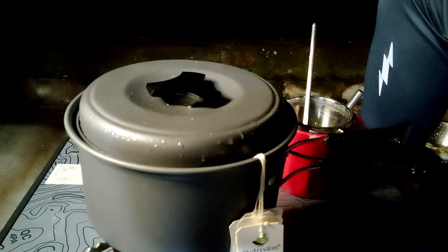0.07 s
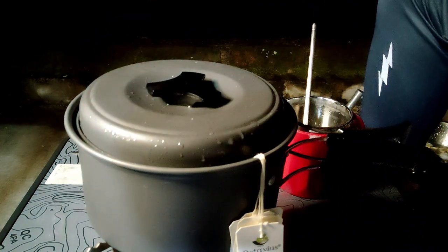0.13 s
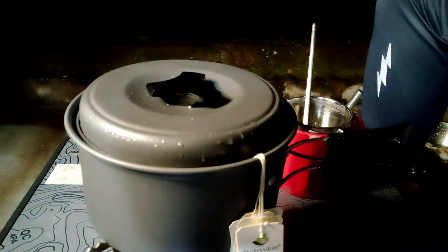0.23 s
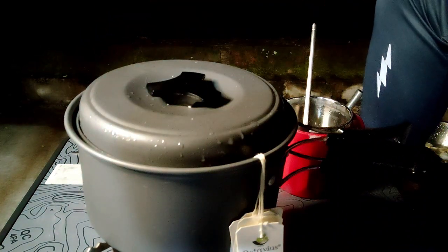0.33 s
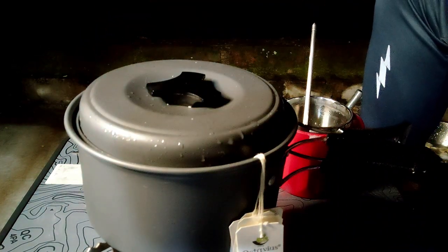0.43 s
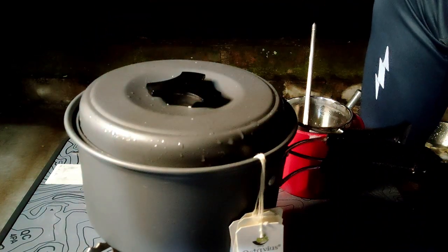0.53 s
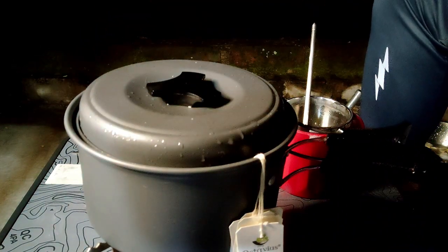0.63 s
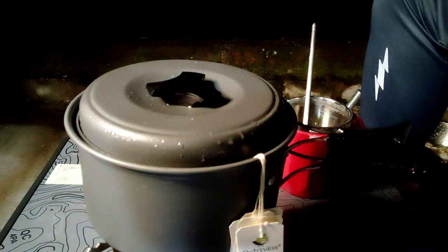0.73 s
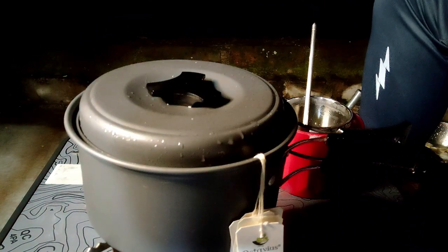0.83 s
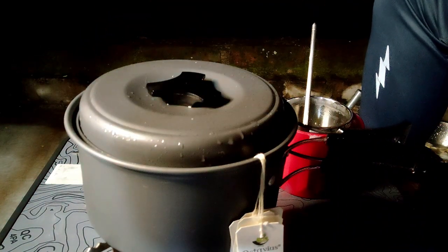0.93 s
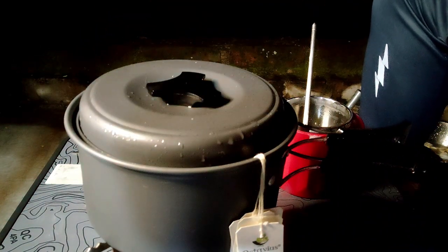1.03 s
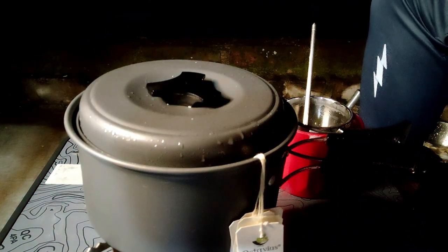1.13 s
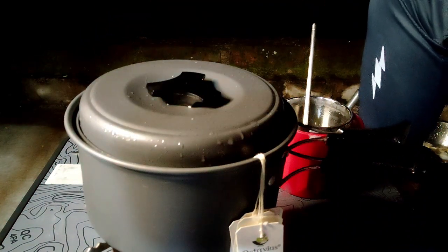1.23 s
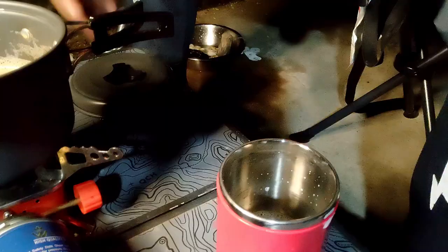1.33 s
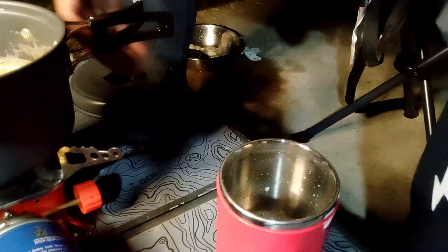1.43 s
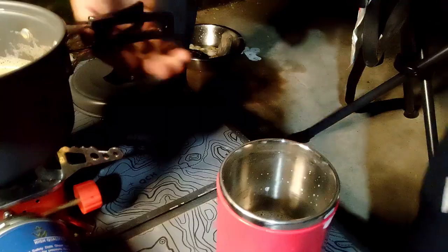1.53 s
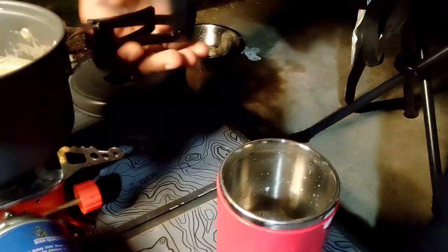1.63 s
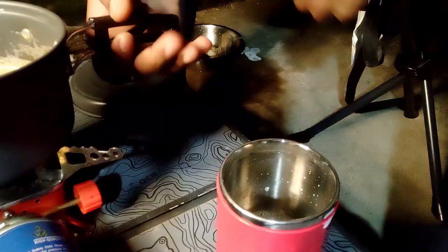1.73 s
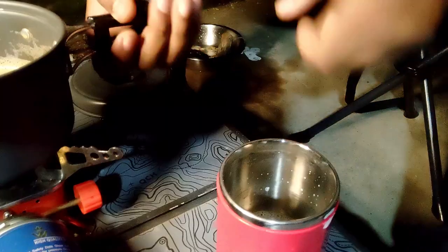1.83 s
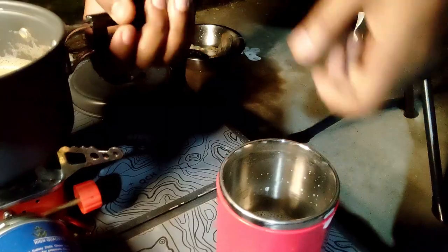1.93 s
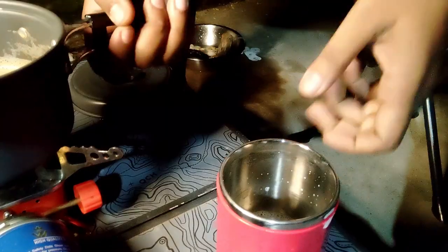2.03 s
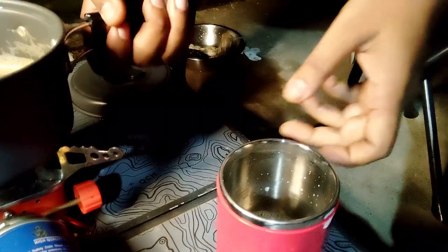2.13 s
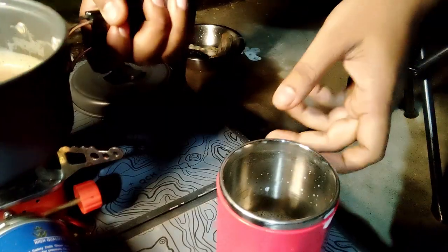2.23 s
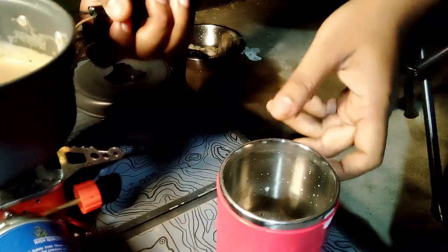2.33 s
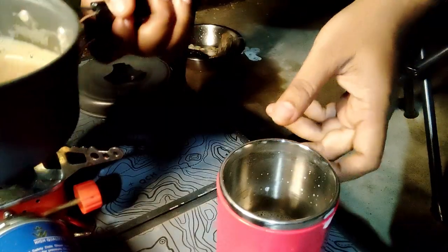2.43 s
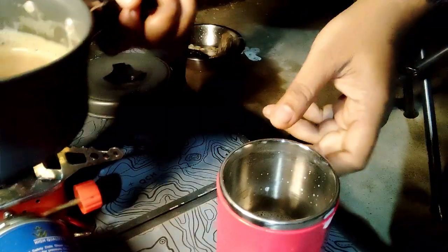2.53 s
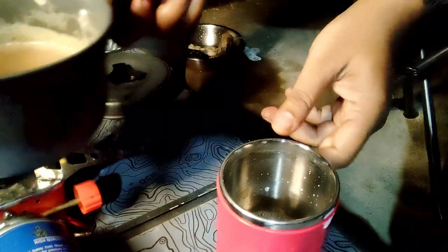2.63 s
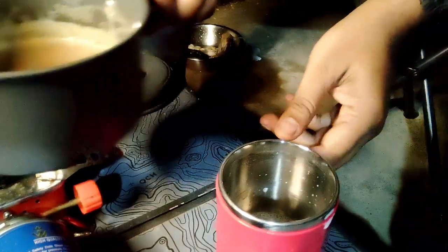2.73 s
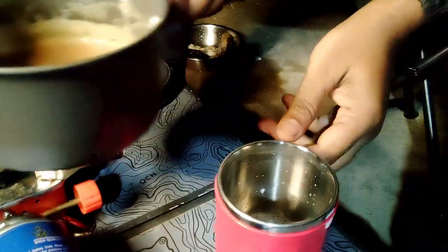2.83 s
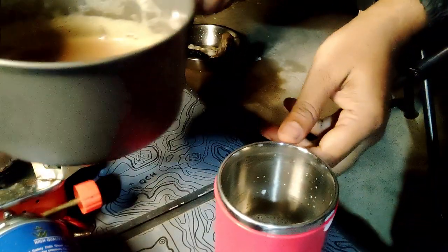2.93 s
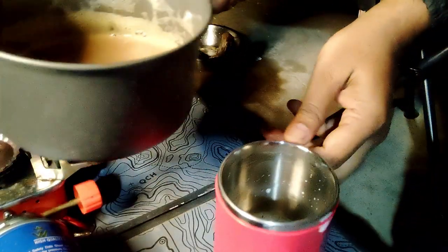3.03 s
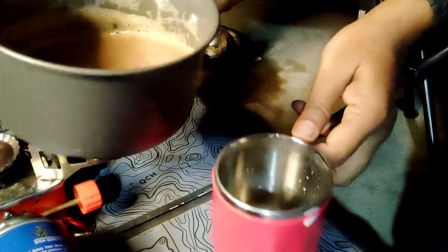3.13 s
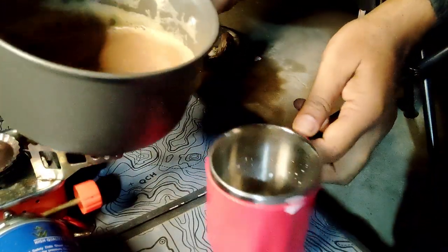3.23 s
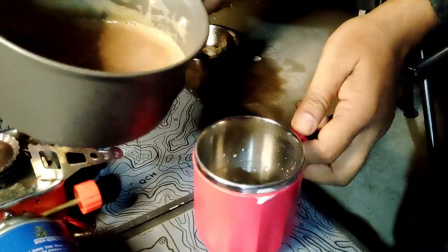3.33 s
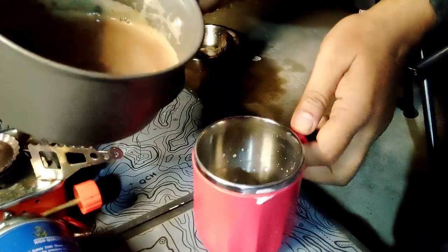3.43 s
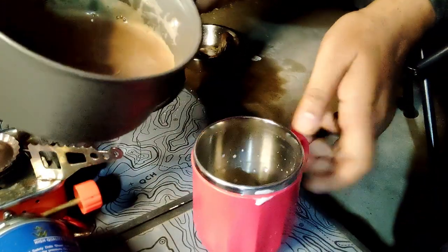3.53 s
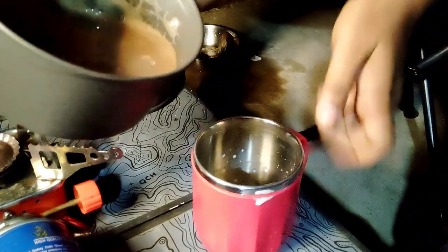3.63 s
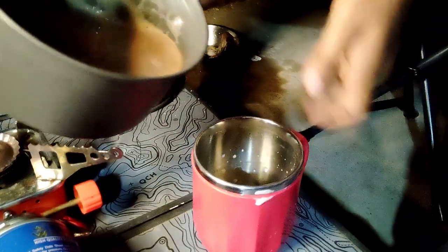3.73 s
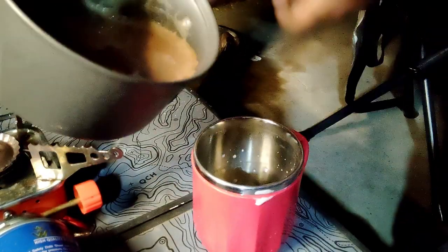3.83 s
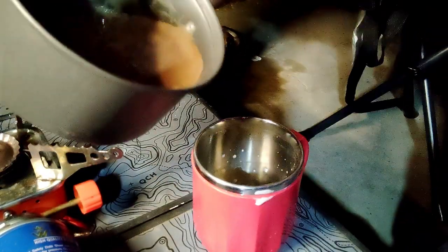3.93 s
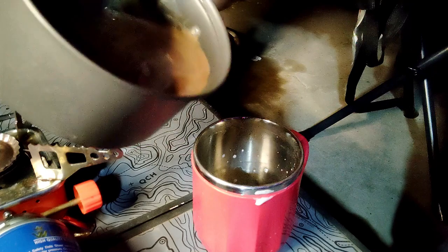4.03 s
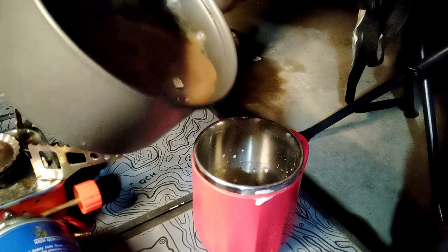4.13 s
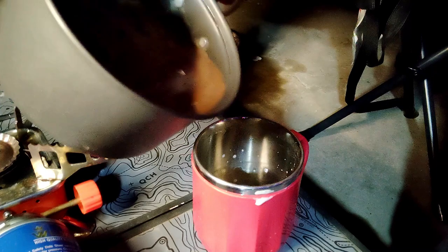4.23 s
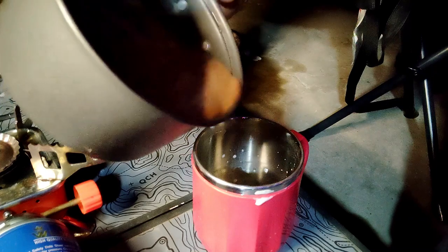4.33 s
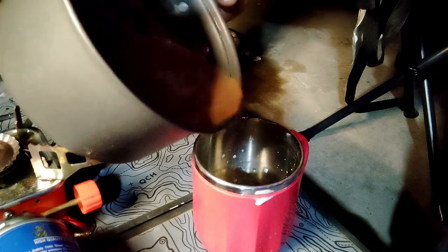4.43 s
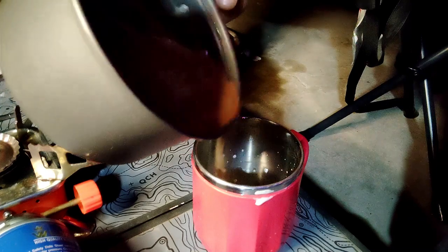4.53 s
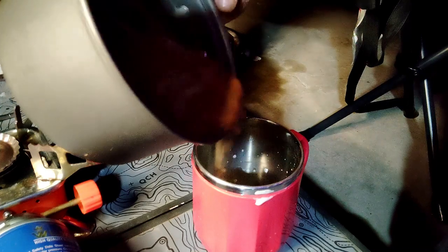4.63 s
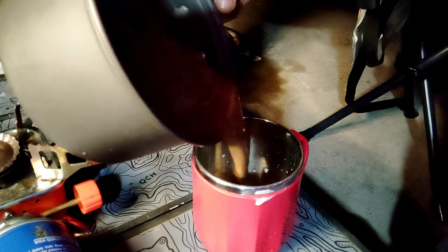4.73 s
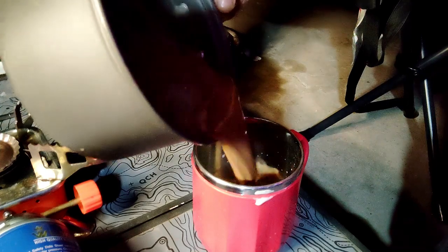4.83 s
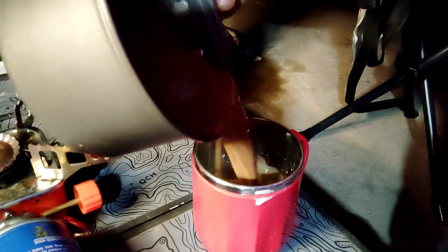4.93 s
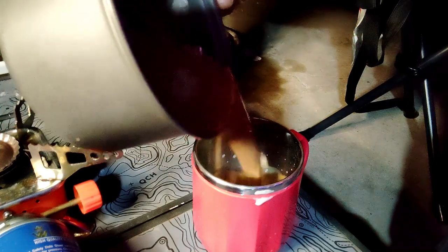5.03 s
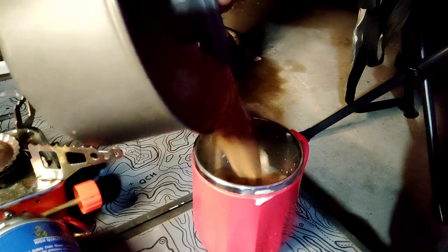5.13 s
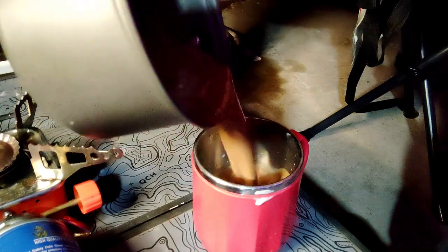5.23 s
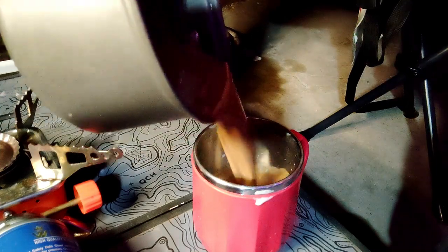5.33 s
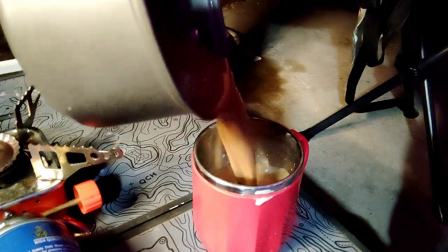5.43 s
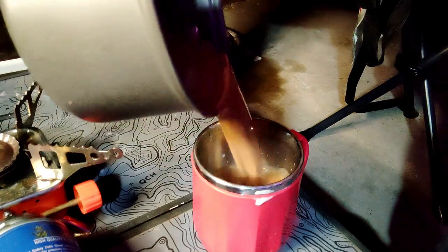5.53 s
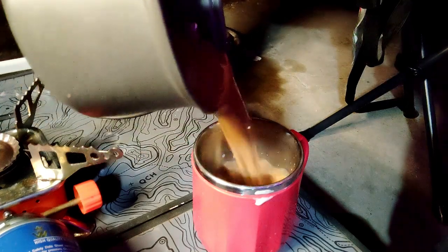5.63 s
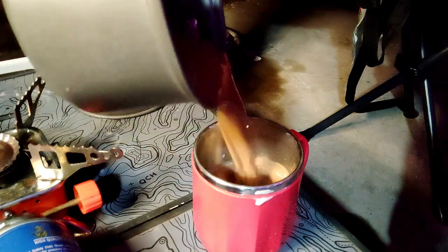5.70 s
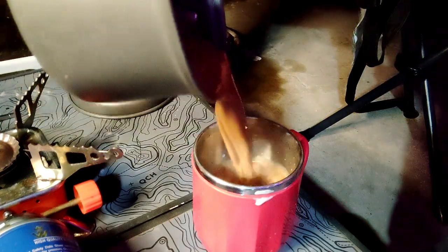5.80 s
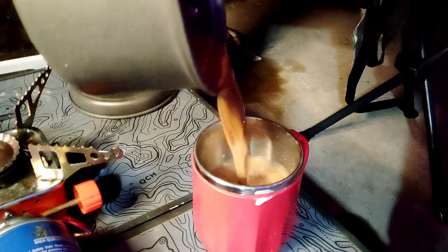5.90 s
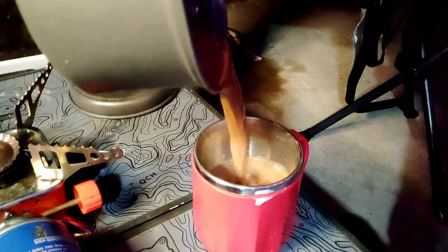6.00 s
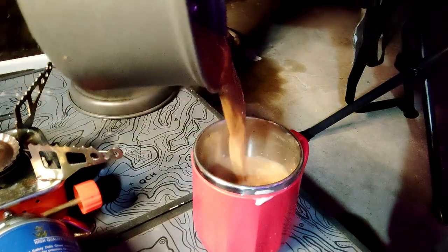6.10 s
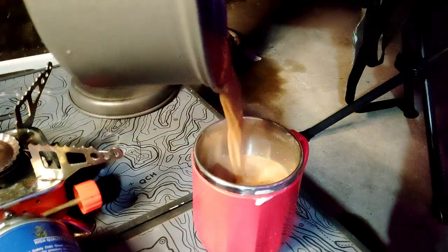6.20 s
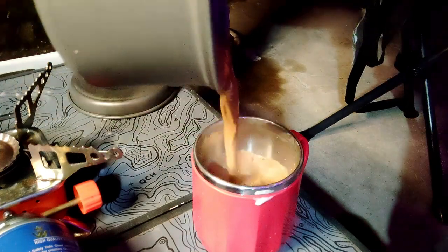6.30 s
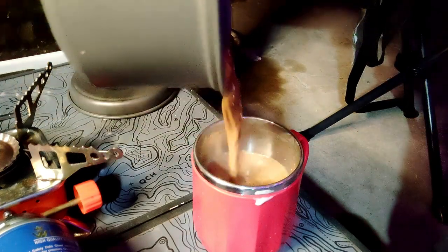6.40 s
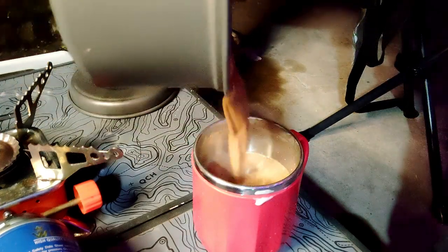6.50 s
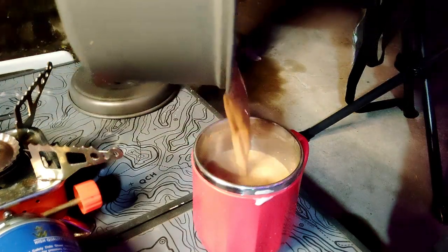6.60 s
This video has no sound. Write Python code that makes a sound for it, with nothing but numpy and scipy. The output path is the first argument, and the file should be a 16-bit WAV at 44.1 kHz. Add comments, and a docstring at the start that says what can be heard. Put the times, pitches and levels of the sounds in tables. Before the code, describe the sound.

Insects drone under a soft hiss at a campsite at night. After a brief drop in all sound, metal cookware clanks close by and a pot judders on a folding table while a cricket chirps. A steel mug is dragged with rattling knocks. Then tea is poured into it, first ticking on bare steel, then drumming, splashing and gurgling as it fills.

```python
"""Insects drone around a campsite at night, under a soft hiss that comes and goes and a few dull bumps.
Cookware clanks on a folding table, a shoved pot judders by stick and slip, and a steel mug is dragged
into place, ringing the table. Then tea is poured from a pot: it drums on the mug's bottom, whose ring
sinks as it is covered, and splashes and gurgles as it traps bubbles of air.
The whole sound dips briefly just before the clanks."""
import sys
import numpy as np
from scipy import signal
from scipy.fft import rfft, irfft, next_fast_len
from scipy.io import wavfile
from scipy.ndimage import uniform_filter1d, map_coordinates

SR = 44100
rng = np.random.default_rng(int(sys.argv[2]) if len(sys.argv) > 2 else 0)


def pcm_store(signal):
    """Save signal as 16-bit PCM."""
    levels = np.round(np.clip(np.atleast_2d(signal), -1, 1) * 32767)
    wavfile.write(sys.argv[1], SR, levels.astype(np.int16).T)


N = 293706

# strength of the pour, a trickle and then the full stream: time_s, level_db
FLOW = [(4.68, -58), (4.798, -46.5), (4.93, -57.5), (5.02, -59), (5.074, -38), (5.302, -38.5),
        (5.312, -36.5), (5.452, -38), (5.504, -43), (5.964, -37.5), (6.038, -42.5), (6.11, -40),
        (6.39, -46.5), (6.66, -43.5)]
POUR_START_S, STREAM_START_S, POUR_END_S = FLOW[0][0], FLOW[3][0], FLOW[-1][0]
# modes of the mug's bottom: ratio_to_lowest, level_db
BOTTOM_MODES = [(1, 7), (1.42, -9)]
BARE_HZ, LOADED_HZ = 790, 287  # its lowest mode, bare and under deep tea
COVERED_S, LOADING_S = 5.12, 0.363  # when tea covers it; time constant of the sinking pitch
# air resonances inside the mug: pitch_hz, width_hz, level_db
CAVITY = [(620, 190, -9), (864, 180, -9), (1340, 140, -3), (1810, 470, -4.5), (2460, 180, -1),
          (3300, 270, 3.5), (4140, 570, -1), (5490, 340, 0)]
# EQ of the fine spray: frequency_hz, gain_db
SPRAY_EQ = [(300, 2.5), (900, -13), (1400, 8), (2500, 0.5), (3400, -3.5), (4800, 4), (6200, -3.5),
            (9500, -19), (12000, -26), (16000, -31)]
# the biggest splashes: start_s, level_db, pitch_hz, tick_relative_db, hollow_relative_db
SPLASHES = [(4.9538, -12.5, 2700, -11, -12), (4.9745, -16.5, 2900, 1, -12), (5.0597, -20.5, 3600, -30, -5),
            (5.0743, -21, 4080, -27, -6), (5.1115, -19, 3600, -13, -8), (5.1235, -19.5, 3500, -5, -9),
            (5.1548, -17, 3500, -20, 1), (5.173, -18, 3880, -30, -11), (5.22, -20, 3630, -25, -21),
            (5.253, -18, 4470, -30, -16), (5.307, -20, 4950, -25, -20), (5.312, -22, 3400, -26, -13),
            (5.323, -16, 3520, -20, -3), (5.3354, -15.5, 4570, -32, -19), (5.355, -15.5, 3340, -22, -10),
            (5.369, -14.5, 3300, -34, -13), (5.383, -26, 3330, -28, -6), (5.4152, -18.5, 3070, -28, -14),
            (5.425, -15.5, 3250, -32, -10), (5.437, -21, 4480, -27, -10), (5.4544, -13, 3300, -22, -10),
            (5.461, -14.5, 3240, -35, -9), (5.509, -20, 1440, -26, 2), (5.546, -29, 2540, -24, -4),
            (5.557, -23, 1850, -19, 8), (5.603, -18, 3150, -15, -3), (5.615, -27.5, 6260, -11, -14),
            (5.651, -26, 3140, -26, -6), (5.679, -19, 3600, -15, -9), (5.715, -21, 4250, -10, -4),
            (5.735, -37, 2700, -24, 3), (5.759, -25, 3450, -4, -12), (5.7838, -19.5, 1310, -23, 0),
            (5.809, -26.5, 2460, -28, -9), (5.837, -26, 3370, -5, -6), (5.863, -17, 4080, -26, -5),
            (5.888, -20, 3900, -32, -11), (5.923, -20.5, 4280, -28, 7), (5.9468, -15.5, 4000, -31, -9),
            (5.961, -20.5, 3290, -26, -12), (6.027, -24, 4200, -32, 2), (6.049, -27, 3250, -30, 0),
            (6.065, -22, 3300, -24, -3), (6.074, -28, 2700, -32, 8), (6.089, -19.5, 3200, -34, 9),
            (6.1023, -14.5, 3380, -40, -2), (6.118, -15.5, 3400, -40, -2), (6.1415, -16, 3550, -35, 4),
            (6.1604, -21, 3500, -38, 1), (6.1675, -15.5, 3630, -32, -3), (6.1763, -22, 3400, -24, -0.5),
            (6.183, -26, 4080, -30, -6), (6.205, -23.5, 3660, -35, -10), (6.241, -17, 3460, -33, -6.5),
            (6.2888, -21.5, 3490, -35, -10), (6.2957, -20, 4160, -32, -13), (6.32, -24, 3350, -7, 9),
            (6.354, -27, 3420, -35, -12), (6.464, -23, 3500, -8, -2), (6.515, -22, 3900, -30, 9),
            (6.558, -27.5, 3640, -28, -12), (6.643, -27, 1600, -26, -1)]
# the mug's hollow answer to a splash: pitch_hz, width_hz, level_db
HOLLOW_MODES = [(1338, 57, 0), (1630, 190, -4.5), (1980, 280, -5), (2510, 170, -2.5)]
# EQ of a drop ticking on steel: frequency_hz, gain_db
TICK_EQ = [(1000, -28), (4500, 7.5), (7500, 4), (9500, -12), (12000, 7), (16000, -8)]
# slugs of tea that trap air: start_s, level_db, pitch_hz
GLUGS = [(5.222, -32, 677), (5.281, -29.5, 830), (5.322, -22.5, 773), (5.334, -27.5, 577),
         (5.456, -27.5, 790), (5.507, -23, 454), (5.732, -20, 219), (5.742, -25, 321), (5.779, -22.5, 336),
         (5.955, -32, 264), (6.162, -31, 328), (6.52, -35.5, 294)]
# first drops on bare steel: start_s, level_db
DRIPS = [(4.716, -22), (4.751, -24), (4.803, -43), (4.838, -37), (4.872, -34), (4.919, -35), (4.958, -37.5),
         (4.992, -39), (5.073, -30), (5.111, -26.5)]
# ring of the empty mug: pitch_hz, level_db, t60_s
EMPTY_MUG_MODES = [(790, 5, 0.079), (886, 0, 0.073), (3084, -13, 0.37), (4130, -9, 0.2), (5370, -15, 0.15)]
# the note the trickle draws from the mug: time_s, pitch_hz, level_db
SINGING = [(4.7, 1300, -60), (4.735, 1350, -48), (4.775, 1358, -41), (4.88, 1332, -52.5), (4.93, 1300, -62),
           (5.1, 1285, -58)]
# stereo tilt of the splashing: frequency_hz, left_over_right_db
MUG_PAN = [(60, 0), (110, 1), (200, -14), (380, 2), (700, 5), (1290, 6), (2380, 8.5), (4400, 12.5),
           (8120, -10), (15000, 8)]

# cookware contacts: start_s, level_db, thud_relative_db, click_relative_db, chatter_s
CLANKS = [(1.679, -17, -7, -10, 0.0063), (1.71, -24, 1, -3, .008), (1.749, -3.5, -10.5, -3.5, .012),
          (1.768, -12.5, -9, -25, .01), (1.815, -6.5, -6.5, -8, .012), (1.838, -15, -3.5, -25, 0.011),
          (2.085, -18.5, 2, -15, .004), (2.106, -13.5, -26, -11, 0.0048), (3.468, -20.5, -0.5, -5, .004)]
# ring of the struck pot: pitch_hz, width_hz, level_db
POT_MODES = [(400, 124, -4.5), (655, 41, 0), (714, 44, 3.5), (890, 97, 0), (1025, 36, -4.5),
             (1144, 20, 6.5), (1285, 20, 4.5), (1391, 31, 1), (1758, 56, 3.5), (1920, 92, -5),
             (2300, 16, -2), (2500, 87, -14), (3010, 116, -14), (3500, 260, -20.5), (3725, 140, -4),
             (4660, 90, -8), (4940, 70, -6), (5240, 350, -11), (7730, 110, -15)]
# EQ of a hard contact: frequency_hz, gain_db
CLICK_EQ = [(300, -41), (1000, 0), (4500, -1.5), (7000, -6), (10000, -14.5), (13000, -14.5), (16000, -21)]
# stereo tilt of the clanks: frequency_hz, left_over_right_db
POT_PAN = [(60, -23), (130, -2.5), (290, 1), (640, -6.5), (1410, 4), (3100, 12), (6820, -7.5), (15000, 0)]
# pushes that make the pot judder: start_s, hold_s, boom_db, rattle_db, fade_s
SHOVES = [(2.043, 0.099, -21.5, -27.5, 0.0078), (2.345, 0.052, -31.5, -39, 0.0282)]
# rattle of the juddering pot: pitch_hz, width_hz, level_db
RATTLE_MODES = [(514, 51, 1.5), (706, 57, -3.5), (890, 70, -11), (1005, 85, -6), (1166, 78, -0.5),
                (1715, 87, -1.5), (2090, 140, -8.5)]
# the pot rings with each shove: start_s, level_db, attack_s
POT_RINGS = [(2.106, -25.5, 0.0017), (2.322, -34.5, 0.036)]
# pushes that drag the mug: start_s, hold_s, table_db, mug_db, scrape_db, fade_s
DRAGS = [(2.937, 0.032, -36, -44.5, -44, 0.032), (3.03, 0.035, -41.5, -51, -56, 0.028),
         (3.138, 0.033, -36.5, -44.5, -55, 0.025), (3.241, 0.17, -25, -30, -32, 0.0028),
         (3.429, 0.045, -28.5, -32, -32.5, 0.017), (3.637, 0.02, -36.5, -50, -42.5, 0.02)]
# catches of the dragged mug: start_s, table_thud_db, mug_knock_db
JOLTS = [(2.946, -20.5, -44), (3.2405, -8.5, -27.5), (3.265, -16.5, -32), (3.296, -14, -39),
         (3.314, -10, -29), (3.336, -12, -25), (3.364, -15, -27), (3.386, -15, -26), (3.447, -16, -25.5),
         (3.468, -27, -27), (3.515, -22, -40), (3.634, -36, -30)]
# EQ of the mug's grating base: frequency_hz, gain_db
SCRAPE_EQ = [(180, -8), (400, -11.5), (700, -7), (1030, -15), (1580, -12), (2600, -12), (4910, -19.5),
             (9710, -38.5), (11300, -36), (14700, -41), (16000, -72)]
# body of the folding table: pitch_hz, width_hz, level_db
TABLE_MODES = [(211, 51, 5), (303, 84, -3), (410, 45, -8), (566, 80, -12.5), (696, 73, -15),
               (805, 72, -17.5), (1140, 97, -25.5), (1750, 250, -23.5)]
# body of the mug standing on it: pitch_hz, width_hz, level_db
MUG_MODES = [(543, 130, -8.5), (805, 31, 4.5), (875, 77, -5), (1150, 160, -11), (1320, 61, 0),
             (1394, 70, -5.5), (1740, 40, -9)]
# dull bumps and two bright ticks on the table: start_s, level_db, pitch_hz, tick_relative_db
BUMPS_AND_TICKS = [(0.149, -33.5, 436, 3.5), (1.196, -31, 497, -20), (1.231, -22, 400, -27),
                   (1.244, -26, 140.6, -26), (1.274, -26, 135, -31), (3.409, -27, 470, 9),
                   (3.44, -28, 500, 15), (3.985, -32, 446, -18)]
# one brush of cloth: peak_s, level_db, pitch_hz, swell_s
SCUFF = (0.462, -42.5, 900, 0.028)

# choruses of far insects: pitch_hz, width_hz, level_db, left_over_right_db, swell_db
CHORUSES = [(1924, 394, -42.5, 1, 0.5), (4850, 3500, -58, 2.5, 5), (7240, 1000, -69.5, -18, 1),
            (13400, 4900, -64.5, -2, -1.5)]
# cricket chirps: start_s, level_db
CHIRPS = [(2.04, -40), (2.245, -39.5), (2.49, -40), (2.875, -44.5), (3.165, -46), (3.75, -48), (4.15, -63)]
# EQ of the night air: frequency_hz, gain_db
AIR_EQ = [(20, -24), (40, 1), (100, 3), (200, 1.5), (350, -10), (600, -13), (1300, -18), (2800, -37),
          (5000, -11.5), (6300, -37.5), (9000, -46), (15000, -58)]
# stereo tilt of the night air: frequency_hz, left_over_right_db
AIR_PAN = [(60, 1), (400, 0), (1300, 0), (4400, 2), (8000, -21), (15000, 7)]
# fader ride on air and insects together: time_s, gain_db
NIGHT_FADER = [(0, -4.5), (1.4, -1), (3, 3), (6.66, 2.5)]
# sudden shrill rasps: start_s, fall_s, level_db, pitch_hz
RASPS = [(1.556, 0.19, -34.5, 4560), (2.71, 0.13, -42, 4700), (3.573, 0.028, -38, 4500),
         (3.66, .35, -46, 4700)]
# resonances of a rasp: ratio_to_pitch, width_hz, level_db
RASP_MODES = [(.48, 250, -7.5), (.68, 300, -4.5), (.845, 220, 1.5), (1, 170, 6), (1.143, 150, -11)]
# swells of the soft hiss: peak_s, level_db, rise_s, fall_s
HISS_SWELLS = [(0.05, -45.5, .3, 0.25), (0.449, -41.5, 0.082, 0.036), (0.97, -38, 0.36, 0.26),
               (1.76, -35.5, 0.17, 0.13), (2.08, -36.5, 0.22, 0.055), (2.38, -40.5, 0.25, 0.58),
               (3.82, -44, 0.85, 0.32)]
# EQ of the hiss: frequency_hz, gain_db
HISS_EQ = [(180, -53), (300, -8), (486, -11.5), (614, -9), (1140, -12), (2030, -1.5), (3700, -7),
           (4910, -6.5), (5610, -14), (8790, -29), (9880, -41.5), (12900, -26), (16000, -41)]
# stereo tilt of the hiss: frequency_hz, left_over_right_db
HISS_PAN = [(300, 1), (700, 2), (2000, 7), (3500, 5), (4600, 8.5), (6000, -5), (8200, -17), (11000, -16.5),
            (15000, 9)]
# a faint rising squeak: time_s, pitch_hz, level_db
SQUEAK = [(0.95, 2650, -50), (0.985, 3000, -42), (1.03, 3480, -38), (1.05, 3600, -54)]

# stereo image of near sounds: frequency_hz, left_right_correlation
NEAR_IMAGE = [(150, 1), (500, 0.74), (1200, 0.15), (2500, 0.14), (5000, 0.019)]
# stereo image of far sounds: frequency_hz, left_right_correlation
FAR_IMAGE = [(40, 0.26), (150, 0.83), (600, -0.00093), (1500, -0.36), (4000, -0.022), (8000, -0.053)]
# stereo image of the dragged mug's ring: frequency_hz, left_right_correlation
MUG_IMAGE = [(500, 0.57), (1400, .6)]
# master fader, with one brief deep dip: time_s, gain_db
MASTER_FADER = [(1.334, 2.5), (1.339, -47), (1.39, -44), (1.405, -15), (1.48, -10.5), (1.56, -2.5)]


def drumming(level_db=-5, wall_db=-3, per_s=150, cycles=20, wall_hz=860, wall_width_hz=130,
             damped_s=5.42, damping_s=0.14, cushion_db_per_s=1.5):
    """Beads of tea drum on the steel bottom, whose modes sink under their weight; the wall rings too."""
    span = POUR_END_S - POUR_START_S
    bottom, t = np.zeros(N), np.arange(SR // 12) / SR
    for when, size, detune in rng.random((int(per_s * span), 3)):
        s = POUR_START_S + when * span
        mode_hz = LOADED_HZ + (BARE_HZ - LOADED_HZ) * np.exp(-max(s - COVERED_S, 0) / LOADING_S)
        # deeper tea detunes each bead's ring further
        hz = mode_hz * np.exp(.36 * (1 - mode_hz / BARE_HZ) * (2 * detune - 1))
        ring = sum(amp(db - 60 * t * hz / cycles) * np.sin(2 * np.pi * ratio * hz * t)
                   for ratio, db in BOTTOM_MODES)
        add(bottom, s, amp(13.5 * size) * hz ** .7 * ring * (1 - np.exp(-t / 0.0081)))
    bottom = unit(bottom) * np.sqrt(span / (N / SR))  # rms 1 over the pour
    patter = stereo_noise() * amp(4.3 * wobble(70))
    wall = resonate(patter, [(wall_hz, wall_width_hz, 0)])
    wall = unit(resonate(wall, [(wall_hz, 2 * wall_width_hz, 0)]))
    wall *= stroke(COVERED_S, damped_s - COVERED_S, 0.046, damping_s)
    flow_db, = curves(FLOW)
    # rising tea shields the bottom from the stream
    cushion_db = cushion_db_per_s * np.maximum(np.arange(N) / SR - COVERED_S, 0)
    return amp(flow_db - cushion_db) * during(FLOW) * (amp(level_db) * bottom + amp(wall_db) * wall)


def spray(per_s=1200, centre_hz=3500, spread=0.236, cycles=22, size_db=5,
          bubble_db=-5.0, wash_db=-1, fizz_db=-4.5):
    """A crowd of tiny bubbles rings over the wash of the stream in the mug's cavity."""
    span, t = POUR_END_S - POUR_START_S, np.arange(SR // 50) / SR
    when, size, lag = rng.random((int(per_s * span), 3)).T
    hz = np.clip(centre_hz * np.exp(spread * rng.standard_normal((len(when), 1))), 900, 9000)
    gains = amp(-size_db * np.log(np.maximum(size, .03)))[:, None]
    envelopes = gains * amp(-60 * t * hz / cycles) * (1 - np.exp(-t / 0.00064))
    index = ((POUR_START_S + when * span) * SR).astype(int)[:, None] + np.arange(len(t))
    bubbles = np.zeros((2, N))
    for channel in range(2):
        # reflections off the steel wall reach left and right out of step
        grains = envelopes * np.sin(2 * np.pi * (hz * t + channel * lag[:, None]))
        bubbles[channel] = np.bincount(index.ravel(), grains.ravel(), N)[:N]
    bubbles = unit(coloured(bubbles, SPRAY_EQ)) * np.sqrt(span / (N / SR))
    beads = wobble(170)  # the stream arrives in beads that pulse wash and fizz together
    wash = unit(resonate(stereo_noise() * amp(5.8 * beads), CAVITY))
    fizz = unit(coloured(stereo_noise() * amp(1.1 * beads + 3.3 * wobble(700)), SPRAY_EQ))
    mix = amp(bubble_db) * bubbles + amp(wash_db) * wash + amp(fizz_db) * fizz
    flow_db, = curves(FLOW)
    return amp(flow_db) * during(FLOW) * placed(mix, MUG_PAN)


def splashes(cycles=23, crack_db=-5, hollow_db=-1, tick_db=3, shed_s=.009, shed_db=-10, spread=0.14):
    """Larger drops: a tick, a ringing bubble that sheds a fainter one, and the mug's hollow answer."""
    out, t = np.zeros((2, N)), np.arange(SR // 20) / SR
    for s, db, hz, tick_rel_db, hollow_rel_db in SPLASHES:
        answer = crest(resonate((t == 0) + 0.16 * burst(t, 0.016), HOLLOW_MODES))
        bubble = ping(t, hz, cycles / hz, 0.00041, rise=0.04)
        crack = amp(crack_db) * snap(t, 0.012, SPRAY_EQ)
        drop = crest(bubble + crack + amp(hollow_rel_db + hollow_db) * answer)
        tick = amp(tick_rel_db + tick_db) * snap(t, 0.015, TICK_EQ)
        add(out, s, amp(db) * (drop + tick))
        delay, detune = rng.random(2)
        shed_hz = hz * np.exp(2 * spread * (detune - .5))
        if s > STREAM_START_S:  # only a pool of tea can hold the shed bubble
            shed = ping(t, shed_hz, cycles / hz, 0.00038, rise=.05)
            add(out, s + shed_s * delay, amp(db + shed_db) * shed)
    return placed(out, MUG_PAN)


def glugs(level_db=-3, cycles=15, slap_db=1, slap_t60=0.14):
    """Slugs of tea trap air and thump into the mug with a wet slap."""
    out, t = np.zeros((2, N)), np.arange(SR // 6) / SR
    for s, db, hz in GLUGS:
        slap_modes = [(1.47 * hz, 200, 0), (850, 150, -13), (1340, 120, -5)]
        slap = crest(resonate(burst(t, slap_t60), slap_modes))
        bubble = ping(t, hz, cycles / hz, 0.0075, rise=0.017)
        add(out, s, amp(db + level_db) * (bubble + amp(slap_db) * slap))
    return out


def spatter(per_s=26, level_db=5, scatter_db=9):
    """Tiny droplets thrown off the stream tick on the steel wall."""
    out, t = np.zeros((2, N)), np.arange(SR // 50) / SR
    span = POUR_END_S - COVERED_S
    for when, size in rng.random((int(per_s * span), 2)):
        s = COVERED_S + when * span
        db = np.interp(s, *np.transpose(FLOW)) + level_db + scatter_db * (size - .5)
        add(out, s, amp(db) * snap(t, 0.0062, TICK_EQ))
    return out


def drips(tick_db=-19):
    """The first drops tick on the steel and ring the empty mug."""
    out, t = np.zeros((2, N)), np.arange(SR // 2) / SR
    for s, db in DRIPS:
        ring = sum(amp(mode_db + rng.normal(0, 2)) * ping(t, hz, t60, 0.003)
                   for hz, mode_db, t60 in EMPTY_MUG_MODES)
        add(out, s, amp(db) * (crest(ring) + amp(tick_db) * snap(t, 0.059, TICK_EQ)))
    return out


def singing(pan_db=9.0, flutter_db=4):
    """The thin first trickle keeps one note of the mug sounding, wavering in pitch and level."""
    hz, db = curves(SINGING)
    phase = np.cumsum(hz * (1 + .008 * wobble(160))) / SR
    gain = amp(db + flutter_db * wobble(90)) * during(SINGING)
    return panned(pan_db) * gain * np.sin(2 * np.pi * phase)


def cookware(click_db=3, after_db=-19, after_hz=2600):
    """Each contact chatters briefly, rings the pot and shakes the table; a dull after-rattle follows."""
    out, t = np.zeros((2, N)), np.arange(SR // 4) / SR
    for s, db, thud_rel_db, click_rel_db, hold in CLANKS:
        after_rattle = filtered(burst(t, 0.71), lambda hz: 1 / (1 + (hz / after_hz) ** 2))
        ring = crest(resonate(chatter(t, hold, 0.019) + amp(after_db) * after_rattle, POT_MODES))
        click = crest(coloured(chatter(t, hold / 2, 0.043), CLICK_EQ))
        shake = (t == 0) + 0.067 * burst(t, 0.32)
        thud = crest(resonate(shake, [(202, 49, 5.5), (279, 50, 0.5), (385, 56, -3.5)]))
        add(out, s, amp(db) * (ring + amp(click_rel_db + click_db) * click + amp(thud_rel_db) * thud))
    return placed(out, POT_PAN)


def judder(slip_hz=224, effort_hz=13, jitter=0.044, grit=0.094, ring_hz=724, ring_t60=0.23):
    """Stick and slip boom near the table's lowest mode, faster with effort; each slip rattles the pot."""
    effort, boom_gain, rattle_gain = np.zeros((3, N))
    for s, hold, boom_db, rattle_db, fade in SHOVES:
        push = stroke(s, hold, fade, fade)
        mid_push = stroke(s + hold / 2, 0, rise=0.057, fall=0.057)
        effort += push
        boom_gain += amp(boom_db) * push
        rattle_gain += amp(rattle_db) * push * mid_push
    rate_hz = slip_hz + effort_hz * effort
    phase = np.cumsum(rate_hz * (1 + jitter * wobble(90))) / SR
    slips = np.diff(np.floor(phase), prepend=0) * amp(2.4 * wobble(150))  # one kick a cycle
    rattle = unit(resonate(slips + grit * stereo_noise(), RATTLE_MODES))
    boom = unit(np.sin(2 * np.pi * phase) * amp(1.7 * wobble(66)))
    out = boom_gain * boom + rattle_gain * rattle
    for s, db, attack in POT_RINGS:
        add(out, s, amp(db) * ping(np.arange(SR // 3) / SR, ring_hz, ring_t60, attack))
    return out


def mug_slide(thud_trim_db=-2.5):
    """The mug's base grates along, ringing table and mug; each catch thuds one and knocks the other."""
    table_gain, mug_gain, scrape_gain = sum(np.outer(amp(levels_db), stroke(s, hold, fade, fade))
                                            for s, hold, *levels_db, fade in DRAGS)
    grit = stereo_noise() * amp(1.5 * wobble(260))
    out = scrape_gain * unit(coloured(grit, SCRAPE_EQ))
    out += table_gain * unit(resonate(grit, TABLE_MODES))
    out += mug_gain * unit(resonate(stereo_noise(MUG_IMAGE), MUG_MODES))
    t = np.arange(SR // 5) / SR
    for s, thud_db, knock_db in JOLTS:
        thud = crest(resonate((t == 0) + 0.056 * burst(t, 0.096), TABLE_MODES))
        knock = crest(resonate((t == 0) + 0.1 * burst(t, 0.024), MUG_MODES))
        add(out, s, amp(thud_db + thud_trim_db) * thud + amp(knock_db) * knock)
    # the thin table top radiates little deep bass
    return coloured(out, [(40, -33), (110, -3), (180, 1.0)])


def bumps_and_ticks(t60=0.012):
    """Dull bumps and two bright ticks on the table: each blends an almost toneless thump with a tick."""
    out, t = np.zeros((2, N)), np.arange(SR // 5) / SR
    for s, db, hz, tick_db in BUMPS_AND_TICKS:
        thump = crest(resonate(burst(t, 0.077), [(110, 90, -6), (hz, hz / 2, 0), (2 * hz, hz, -3)]))
        body = crest(ping(t, hz, t60, 0.00085) + thump)
        add(out, s, amp(db) * (body + amp(tick_db) * snap(t, 0.0097, CLICK_EQ)))
    return out


def scuff():
    """A brief, dull brush of cloth."""
    s, db, hz, swell = SCUFF
    cloth = unit(resonate(stereo_noise(), [(0.8 * hz, 180, -2), (1.4 * hz, 300, 0)]))
    return amp(db) * stroke(s, 0, swell, swell) * cloth


def surroundings(x, t60=0.17, wet_db=-14, predelay_samples=130):
    """x plus a faint, short scatter off the table and gear; small things scatter little bass."""
    tail = coloured(burst(np.arange(SR // 6) / SR, t60), [(250, -20), (700, 0), (4000, 0), (14000, -6)])
    impulse = np.pad(tail, ((0, 0), (predelay_samples, 0))) / np.linalg.norm(tail[0])
    return x + amp(wet_db) * signal.fftconvolve(x, impulse, axes=1)[:, :N]


def night(air_db=-47, cricket_hz=5120, pulse_gap_s=0.0295, pulse_width_s=0.0041):
    """The bed: still air, droning insects and one cricket that chirps in three fading pulses."""
    out = amp(air_db) * unit(placed(coloured(stereo_noise(FAR_IMAGE), AIR_EQ), AIR_PAN))
    for hz, width, db, pan_db, swell_db in CHORUSES:
        out += amp(db + swell_db * wobble(5.21)) * panned(pan_db) * chorus(hz, width)
    t = np.arange(SR // 8) / SR
    pulses = sum(amp(-2 * k) * np.exp(-((t - k * pulse_gap_s - pulse_width_s) / pulse_width_s) ** 2)
                 for k in range(3))
    for s, db in CHIRPS:
        add(out, s, amp(db) * pulses * np.sin(2 * np.pi * cricket_hz * t))
    fader_db, = curves(NIGHT_FADER)
    return amp(fader_db) * out


def chorus(hz, width, lag_s=0.0004):
    """Far insects blur into a band of noise; part of it arrives on the left first."""
    direct = rng.standard_normal(N)
    pair = rng.standard_normal((2, N)) + [direct, np.roll(direct, round(lag_s * SR))]
    return unit(filtered(pair, lambda f: 1 / (1 + (2 * (f - hz) / width) ** 2) ** 1.79))


def rasps(pan_db=10.0, attack_s=0.0017):
    """Shrill, narrow hisses on the left that start crisply and fade."""
    out, t = np.zeros((2, N)), np.arange(SR // 2) / SR
    for s, fall, db, hz in RASPS:
        modes = [(ratio * hz, width, mode_db) for ratio, width, mode_db in RASP_MODES]
        tone = unit(resonate(stereo_noise(FAR_IMAGE, size=len(t)), modes))
        add(out, s, amp(db) * tone * (1 - np.exp(-t / attack_s)) * np.exp(-(t / fall) ** 2))
    return panned(pan_db) * out


def hiss(level_db=0.5, rest_db=-55, flutter_db=1):
    """A soft, broad hiss that swells and sinks until the pour."""
    rest = amp(rest_db) * stroke(0, hold=4.63, rise=.1, fall=0.13)
    swell_power = sum((amp(db) * stroke(s, 0, rise, fall)) ** 2 for s, db, rise, fall in HISS_SWELLS)
    gain = np.sqrt(rest ** 2 + swell_power) * amp(level_db + flutter_db * wobble(25.6))
    return gain * unit(placed(coloured(stereo_noise(FAR_IMAGE), HISS_EQ), HISS_PAN))


def rumble(level_db=-40):
    """A faint low rumble while the pots are handled."""
    lows = unit(resonate(stereo_noise(), [(200, 29, 3.5), (335, 112, -3.5)]))
    return amp(level_db) * stroke(1.96, hold=0.21, rise=0.03, fall=0.8) * lows


def squeak(roughness=0.037):
    """A thin, rough upward glide inside the hiss."""
    hz, db = curves(SQUEAK)
    phase = np.cumsum(hz * (1 + roughness * wobble(460))) / SR
    return amp(db) * during(SQUEAK) * np.sin(2 * np.pi * phase)


def ping(t, hz, t60, attack, rise=0):
    """A damped sine, peak 1, whose pitch may rise as it dies."""
    tone = np.sin(2 * np.pi * hz * t * (1 + rise * np.minimum(t / t60, 1)))
    return crest(tone * amp(-60 * t / t60) * (1 - np.exp(-t / attack)))


def burst(t, t60):
    """A dying puff of stereo noise."""
    return stereo_noise(size=len(t)) * amp(-60 * t / t60)


def snap(t, t60, eq):
    """A noise transient shaped by an EQ, peak 1."""
    return crest(coloured(burst(t, t60), eq))


def chatter(t, hold, t60, attack=0.0004):
    """Noise of a contact that chatters for a moment and then dies."""
    return stereo_noise(size=len(t)) * (1 - np.exp(-t / attack)) * amp(-60 * np.maximum(t - hold, 0) / t60)


def stereo_noise(image=NEAR_IMAGE, size=N):
    """White noise whose left-right correlation follows a stereo image table."""
    correlation = np.clip(along(image, np.fft.rfftfreq(size, 1 / SR)), -1, 1)
    angle = np.arccos(correlation) / 2
    mid, side = irfft(rfft(rng.standard_normal((2, size))) * [np.cos(angle), np.sin(angle)], size)
    return np.array([mid + side, mid - side])


def stroke(s, hold, rise, fall):
    """An envelope that rises smoothly to 1 at time s, holds and falls away."""
    t = np.arange(N) / SR - s
    return np.exp(-(np.minimum(t, 0) / rise) ** 2 - (np.maximum(t - hold, 0) / fall) ** 2)


def curves(rows):
    """Automation: one value per sample for each column after the time."""
    times, *columns = np.transpose(rows)
    return [np.interp(np.arange(N) / SR, times, column) for column in columns]


def during(rows):
    """A soft-edged gate, open over the span of an automation table."""
    t = np.arange(N) / SR
    return uniform_filter1d(1. * ((t > rows[0][0]) & (t < rows[-1][0])), size=900)


def wobble(rate):
    """A smooth random curve, rate knots a second."""
    return map_coordinates(rng.standard_normal(int(N * rate / SR) + 4), [np.arange(N) * rate / SR])


def along(points, hz):
    """Look up (frequency_hz, value) points on a log axis."""
    frequencies, values = np.transpose(points)
    return np.interp(np.log(hz + 1), np.log(frequencies + 1), values)


def filtered(x, response):
    """x times a complex response of frequency."""
    n = x.shape[-1]
    padded = next_fast_len(n + SR // 20, True)
    return irfft(rfft(x, padded) * response(np.fft.rfftfreq(padded, 1 / SR)), padded)[..., :n]


def coloured(x, eq):
    """x through a (frequency_hz, gain_db) EQ."""
    return filtered(x, lambda hz: amp(along(eq, hz)))


def resonate(x, modes):
    """x through parallel (pitch_hz, width_hz, level_db) resonances of alternating polarity."""
    return filtered(x, lambda f: sum(
        (-1) ** k * amp(db) * 1j * f * width / (hz * hz - f * f + 1j * f * width)
        for k, (hz, width, db) in enumerate(modes)))


def placed(pair, pan):
    """A stereo pair tilted left or right by frequency."""
    return filtered(pair, lambda hz: amp(np.outer([.5, -.5], along(pan, hz))))


def panned(db):
    """Left and right gains for a level difference."""
    return amp(db * np.array([[.5], [-.5]]))


def add(track, s, sound):
    """Mix a sound into a track at time s."""
    part = track[..., max(round(s * SR), 0):][..., :sound.shape[-1]]
    part += sound[..., :part.shape[-1]]


def amp(db):
    """Decibels to gain."""
    return 10 ** (np.asarray(db) / 20)


def unit(x):
    """Scaled to rms 1."""
    return x / np.sqrt(np.mean(x ** 2) + 1e-20)


def crest(x):
    """Scaled to peak 1."""
    return x / (np.abs(x).max() + 1e-20)


def scene():
    """Handling and pouring up close, the night behind."""
    handling = scuff() + bumps_and_ticks() + cookware() + judder() + mug_slide()
    pouring = drips() + singing() + drumming() + glugs() + spray() + splashes() + spatter()
    return surroundings(handling + pouring) + night() + rasps() + hiss() + rumble() + squeak()


def record(dry, top_hz=15700):
    """The level dips briefly and comes back a little lower; the highest treble is cut."""
    fader_db, = curves(MASTER_FADER)
    return filtered(dry * amp(fader_db), lambda hz: hz < top_hz)


dry = scene()
out = record(dry)
pcm_store(out)
```